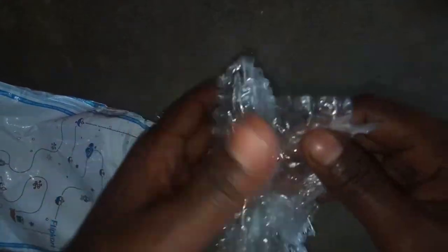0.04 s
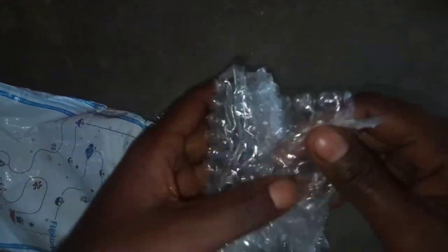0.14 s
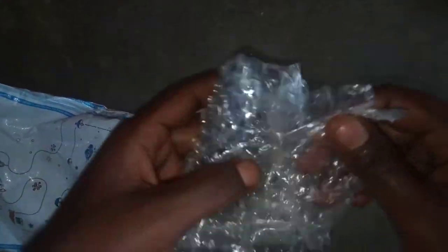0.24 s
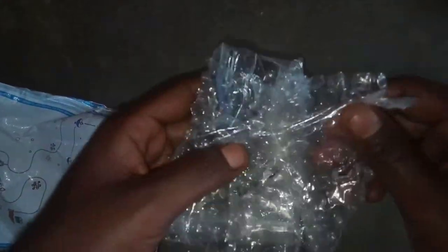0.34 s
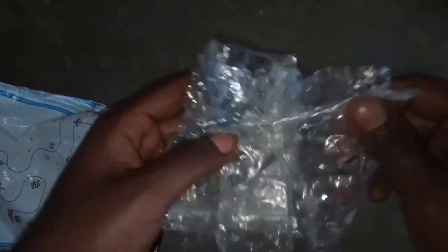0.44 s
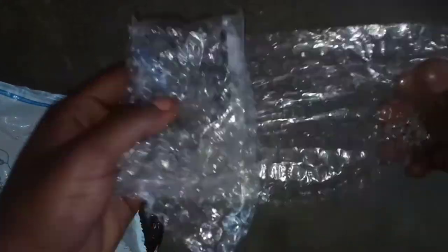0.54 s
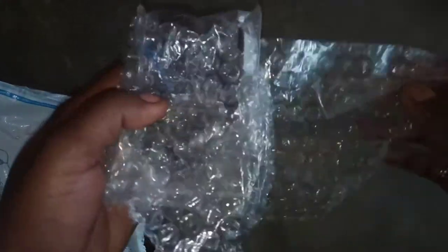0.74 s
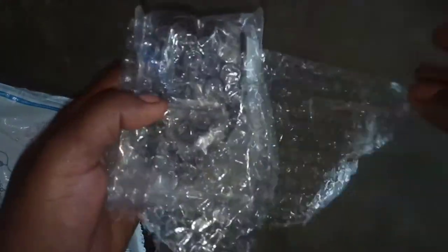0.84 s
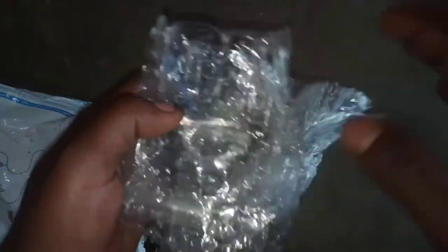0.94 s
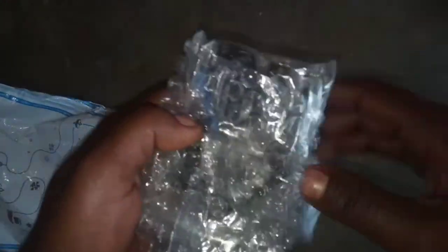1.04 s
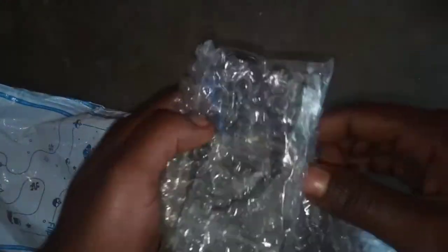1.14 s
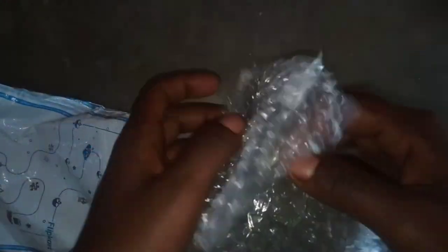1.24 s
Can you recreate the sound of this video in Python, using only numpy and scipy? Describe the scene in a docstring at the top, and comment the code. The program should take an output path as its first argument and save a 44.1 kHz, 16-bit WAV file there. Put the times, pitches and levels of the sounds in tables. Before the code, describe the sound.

Thin bubble wrap film crackles close up as hands pull it open in a quiet room

```python
"""Hands unroll a sheet of plastic bubble wrap close to a small microphone in a quiet room.
A faint tick comes first, then the film buckles in short snaps: clicks and ringing bursts of noise.
Air pockets knock as they fold, over a bed of fine crackle made of thousands of tiny bursts.
About half a second in, one pull ends in a dense burst and a soft low bump, a fading low tone.
Softer snaps and crackle follow near the end; a faint rumble and hiss run all through."""
import sys
import numpy as np
from scipy import signal
from scipy.io import wavfile

SR = 44100
rng = np.random.default_rng(int(sys.argv[2]) if len(sys.argv) > 2 else 0)


def attenuation_scalar(level_db):
    """Turn a level in dB into a linear amplitude multiplier (20 dB per decade)."""
    decades = np.asarray(level_db, float) / 20
    return 10 ** decades


def persist_wave(psi):
    """Save psi, clipped to +-1, as 16-bit WAV."""
    counts = np.round(np.clip(psi, -1, 1) * 32767).astype(np.int16)
    wavfile.write(sys.argv[1], SR, np.atleast_2d(counts).T)


N = 57330  # length in samples: 1.3 s

# Fine crackle while the film slides and bends, which the rumble partly follows.
# Each row: time in seconds, level in dB, extra level of the low band in dB, of the body band in dB.
CRACKLE = [(0, -60.5, 1, 3.5), (.14, -68.5, -19, 3.5), (.2, -60.5, 4, 3), (.225, -54, 0.5, 2),
           (.26, -47.5, 1.5, -8), (.295, -55.5, 11, 3), (.32, -50, 7.5, 2.5), (.38, -49, -5.5, -0.5),
           (.46, -59, 3.5, 2), (.505, -62.5, 1, 0), (.525, -55, 12, -3), (.556, -47, 7, -8),
           (.565, -35, 4, -2), (.593, -35, 12, 6), (.599, -47.5, 5.5, -2), (.64, -45, 8.5, 0.5),
           (.68, -53, 5.5, 0.5), (.88, -64, -1.5, -0.5), (.94, -71.5, 1, -5.5), (1.1, -67.5, 7.5, 3.5),
           (1.12, -55.5, -2, -0.5), (1.2, -57, 9, 2), (1.3, -56.5, -1.5, -1)]
GRAIN_T60_S = 0.0048  # time for the main part of a crackle grain or a knock's blow to fall by 60 dB


def curve(table, column):
    """One column of a time table, drawn as straight lines through every sample."""
    rows = np.array(table)
    return np.interp(np.arange(N) / SR, rows[:, 0], rows[:, column])


def evened(x):
    """Scales a signal to an rms of 1."""
    return x / np.sqrt(np.mean(x ** 2) + 1e-20)


def add(mix, s, sound):
    """Mixes a sound in at time s, in seconds."""
    part = mix[..., round(s * SR):][..., :sound.shape[-1]]
    part += sound[..., :part.shape[-1]]


def filtered(x, hz, kind):
    """A gentle filter that keeps only the low, middle or high part of a sound."""
    return signal.sosfilt(signal.butter(N=2, Wn=hz, btype=kind, fs=SR, output="sos"), x)


def ring(x, hz, width_hz):
    """A brief resonance of gain 1 at hz; the narrower it is, the longer it rings."""
    return signal.lfilter(*signal.iirpeak(hz, hz / width_hz, fs=SR), x)


def bands(parts):
    """Filters four signals, the first into the low band, then body, bright and airy bands."""
    a, b, c = 1000, 2400, 7000  # where the bands meet, Hz
    shapes = [(a, "low"), ((a, b), "band"), ((b, c), "band"), (c, "high")]
    # every other band is turned upside down, so that neighbours join without a dip
    flips = np.reshape([1, -1, 1, -1], (4,) + (1,) * np.ndim(parts[0]))
    return flips * np.array([filtered(x, hz, kind) for x, (hz, kind) in zip(parts, shapes)])


def burst(noise, t60):
    """A buckle: a click, noise that dies in a few milliseconds and a faint longer flutter, peak 1."""
    rise_s = .0001
    flutter_db, flutter_t60_s = -15, 0.057
    click = 2.78  # height of the sharp first click
    t = np.arange(noise.shape[-1]) / SR
    fall = attenuation_scalar(-60 * t / t60) + attenuation_scalar(flutter_db - 60 * t / flutter_t60_s)
    x = noise * (1 - np.exp(-(t + 1 / SR) / rise_s)) * fall
    x[..., 4] += click * np.sign(x[..., 4])
    return x / abs(x).max(-1, keepdims=True)


def snaps():
    """Each snap of the film is one burst with its own balance of bands and two rings."""
    # Distinct snaps of the film. Each row: start in seconds, level in dB, body ring in Hz,
    # extra level of the bright band in dB, bright ring in Hz, extra level of the airy band in dB.
    snap_table = [(.015, -29, 1430, -12, 3840, -18), (.2085, -42, 1560, 2, 3770, -12),
                  (.219, -28.5, 1500, 1.5, 4870, 5), (.2488, -7, 1500, -10, 3460, 1),
                  (.2617, -19.5, 1200, 7, 5300, 3), (.2651, -14.5, 1540, -12, 5880, -1),
                  (.2732, -21, 1640, -12, 3400, 6), (.311, -10, 1530, -3.5, 3260, -7),
                  (.3232, -17, 1660, -22, 4330, -5), (.3292, -30.5, 2040, 0, 4060, 20),
                  (.3422, -21, 1430, 11, 3600, -12), (.3498, -22, 1370, 2.5, 3630, -1),
                  (.3609, -11, 1380, -3, 3500, 1.5), (.3695, -11.5, 1720, -4, 3700, 2.5),
                  (.4076, -35.5, 1520, 13.5, 3260, 19.5), (.4304, -20.5, 1560, -4, 3400, 3.5),
                  (.4505, -27, 1250, 3.5, 3800, -6), (.5117, -33, 1820, 14, 3700, 4),
                  (.5235, -17, 2000, 3, 3280, -5), (.529, -28, 1200, 15, 4030, 6),
                  (.54, -16, 1670, -11, 5500, 3), (.5469, -18, 1190, 9, 4770, 4),
                  (.5513, -15, 1960, -10, 4630, 2), (.5548, -13.5, 2030, -4, 5050, -6),
                  (.5584, -15.5, 1340, -11, 4100, 11), (.5634, -7, 1650, 5, 4280, -9),
                  (.567, -6.5, 1980, -16, 4140, -10), (.5746, -17, 1460, 17.5, 4740, 16),
                  (.5776, -18.5, 1150, 15.5, 4770, 16), (.582, -18, 1160, 3, 4240, 16.5),
                  (.5859, -7.5, 1620, 0, 4300, 7), (.592, -15.5, 1590, 9.5, 4230, -8),
                  (.6379, -16, 950, -5.5, 3130, 2.5), (.87, -32, 1040, 3, 5400, 0.5),
                  (.9908, -39, 1810, 6.5, 3070, 5.5), (1.0282, -36.5, 1540, -23, 2990, -20),
                  (1.0381, -32, 1500, 10.5, 6300, -4), (1.0702, -36, 1760, 11.5, 3350, 8.5),
                  (1.1188, -30.5, 1550, 1, 3234, -2), (1.1261, -29.5, 1610, 5, 5360, -3),
                  (1.1883, -31.5, 1560, 6.5, 3250, -3), (1.2076, -35, 1530, 1, 4800, -17),
                  (1.265, -47.5, 1490, 9, 5850, 22)]
    t60_s = 0.0037
    balance_db = (-17.5, -6.5, -8, 0)  # low, body, bright, airy
    ring_width_hz, ring_db = (330, 410), (15, 17)  # body, bright
    out = np.zeros(N)
    noise = rng.standard_normal((len(snap_table), 1200))
    # the airy band dies half as fast as the others
    parts = bands([burst(noise, t60_s)] * 3 + [burst(noise, 2 * t60_s)])
    for k, (s, db, body_hz, bright_db, bright_hz, air_db) in enumerate(snap_table):
        part = parts[:, k].copy()
        for band, hz, width_hz, gain_db in zip((1, 2), (body_hz, bright_hz), ring_width_hz, ring_db):
            part[band] += attenuation_scalar(gain_db) * ring(part[band], hz, width_hz)
        part /= np.linalg.norm(part, axis=1, keepdims=True)
        levels_db = db + np.add(balance_db, [0, 0, bright_db, air_db])
        add(out, s, attenuation_scalar(levels_db) @ part)
    return out


def knocks():
    """Each fold rings a pocket of air, low and short: a burst through two resonances."""
    # Hollow knocks as air pockets fold. Each row: start in seconds, energy in dB, pitch in Hz.
    knock_table = [(.2488, -16.5, 624), (.4076, -31, 720), (.5513, -21, 816), (.5634, -11, 935),
                   (.5859, -17, 655), (0.621, -20.5, 460), (1.158, -36.5, 690), (1.177, -33.5, 890),]
    width_hz = 550
    out = np.zeros(N)
    blows = burst(rng.standard_normal((len(knock_table), 1200)), GRAIN_T60_S)
    for blow, (s, db, hz) in zip(blows, knock_table):
        sound = ring(ring(blow, hz, width_hz), hz, 2 * width_hz)
        add(out, s, attenuation_scalar(db) * sound / np.linalg.norm(sound))
    return out


def crackle():
    """Random small buckles of many shapes and colours, with a smooth rubbing rustle beneath."""
    kinds = 48
    grains_per_s = 1400
    spread_db, biggest = 3.5, 3.93  # step of grain size; largest grain, in steps
    ring_db, colour_db, rustle_db = 10, 4, -6
    air_follow = 0.28  # airy band: extra dB for each dB of crackle level above -58 dB, less below
    starts = rng.random(N) < grains_per_s / SR
    size = attenuation_scalar(spread_db * np.minimum(rng.exponential(1, N), biggest)) * starts
    kind = rng.integers(0, kinds, N)

    # each kind of grain rings at its own pitch and has its own balance of the four bands
    shapes = burst(rng.standard_normal((kinds, 800)), GRAIN_T60_S)
    pitches_hz = np.geomspace(900, 14000, kinds)
    shapes = [x + attenuation_scalar(ring_db) * ring(x, hz, hz / 9) for x, hz in zip(shapes, pitches_hz)]
    shapes /= np.linalg.norm(shapes, axis=1, keepdims=True)
    colour = attenuation_scalar(colour_db * rng.standard_normal((kinds, 4, 1)))
    grains = sum(colour[k] * signal.oaconvolve(size * (kind == k), shapes[k])[:N] for k in range(kinds))

    grains = grains / np.sqrt((grains ** 2).mean(1, keepdims=True))
    parts = grains + attenuation_scalar(rustle_db) * rng.standard_normal(N)
    level_db = curve(CRACKLE, 1)
    air_db = air_follow * (level_db + 58)
    tilt_db = np.array([curve(CRACKLE, 2), curve(CRACKLE, 3), np.zeros(N), air_db])
    return bands(parts * attenuation_scalar(tilt_db + level_db)).sum(0)


def bumps(low_noise):
    """The bundle knocks the hands: low tones, roughened by noise, rise quickly and fade."""
    # Low bumps. Each row: start in seconds, level in dB, pitch in Hz, time to fall by 60 dB in seconds.
    bump_table = [(0.249, -48, 279, 0.018), (0.574, -53, 175, 0.27), (.617, -34.5, 119, 0.059)]
    rise_s, rough = 0.0052, .2
    out = np.zeros(N)
    t = np.arange(SR // 5) / SR  # each bump is cut off after 0.2 s
    for s, db, hz, t60 in bump_table:
        tone = np.sin(2 * np.pi * hz * t) + rough * np.roll(low_noise, -round(s * SR))[:len(t)]
        fade_db = -60 * np.maximum(t - rise_s, 0) / t60
        add(out, s, np.minimum(t / rise_s, 1) * attenuation_scalar(db + fade_db) * tone)
    return out


def handling_noise():
    """Steady low noise between 53.3 and 447 Hz, with an rms of 1."""
    edges = signal.butter(N=3, Wn=(53.3, 447), btype="band", fs=SR, output="sos")
    return evened(signal.sosfilt(edges, rng.standard_normal(N)))


def rumble(low_noise):
    """A faint rumble of handling that partly swells and sinks with the crackle."""
    base_db = -82  # level while the crackle is at -69.5 dB
    follow = 0.56  # dB of rumble for each dB of crackle
    return low_noise * attenuation_scalar(base_db + follow * (curve(CRACKLE, 1) + 69.5))


def room(x):
    """A short diffuse tail: sparse reflections of random sign that die away."""
    t60_s, gap_s = 0.26, .003
    t = np.arange(SR // 2) / SR
    reflections = rng.choice([-1., 1.], len(t)) * (rng.random(len(t)) < .05)
    tail = reflections * attenuation_scalar(-60 * t / t60_s) * (t > gap_s)
    return signal.fftconvolve(x, tail / np.linalg.norm(tail))[:N]


def microphone(x):
    """The colour of a small microphone behind its port, a filter that never acts ahead of the sound."""
    # How strongly each pitch is picked up, before an overall lift.
    # Each row: frequency in Hz, relative gain in dB.
    response = [(30, -39), (300, -14), (520, -11), (655, -4.5), (850, -10), (1250, -9), (1550, -6),
                (1950, -7), (2300, -12), (2800, -8), (4700, -12), (6300, -12.5), (7300, -26.5),
                (10000, -26.5), (12200, -30), (14500, -24), (15600, -27), (16300, -48)]
    lift_db = 9.0
    f, db = np.transpose(response)
    hz = abs(np.fft.fftfreq(8192, 1 / SR))
    log_gain = np.log(attenuation_scalar(np.interp(np.log(hz + 1), np.log(f + 1), db + lift_db)))
    # the phase that belongs to this gain makes the filter respond as early as it can
    phase = -signal.hilbert(log_gain).imag
    taps = np.fft.ifft(np.exp(log_gain + 1j * phase)).real[:4096]
    return signal.fftconvolve(x, taps)[:N]


def scene():
    """Film sounds with their room and hiss as the microphone colours them, plus the low handling."""
    room_db, hiss_db = -12.5, -91  # both ahead of the microphone's colour
    film = snaps() + knocks() + crackle()
    air = film + attenuation_scalar(room_db) * room(film) + attenuation_scalar(hiss_db) * rng.standard_normal(N)
    low_noise = handling_noise()
    handling = bumps(low_noise) + rumble(low_noise)
    return filtered(microphone(air) + handling, 28, "high")[None]


def top_cut(x):
    """Nothing passes above the cut-off."""
    return signal.sosfilt(signal.butter(12, 16480, fs=SR, output="sos"), x)


def record(dry):
    """Turns the finished mix into the sound that is saved."""
    return top_cut(dry)


dry = scene()
out = record(dry)
persist_wave(out)
```